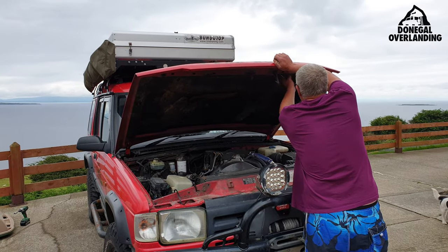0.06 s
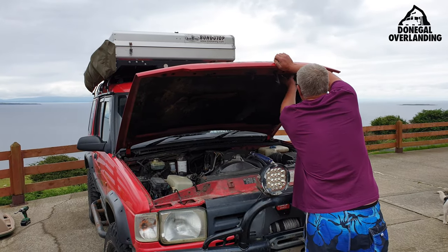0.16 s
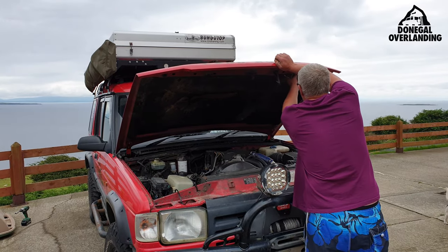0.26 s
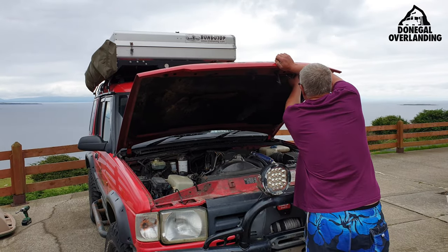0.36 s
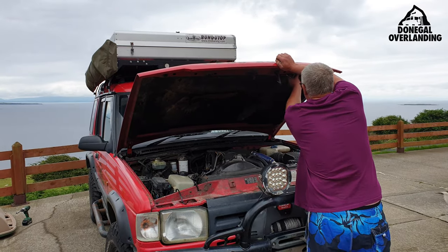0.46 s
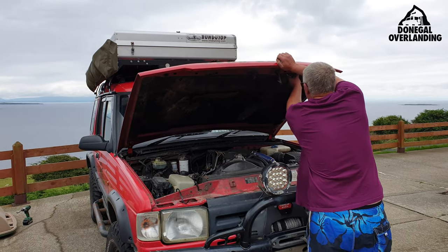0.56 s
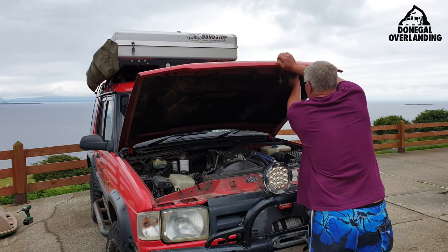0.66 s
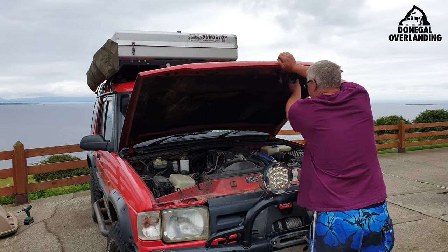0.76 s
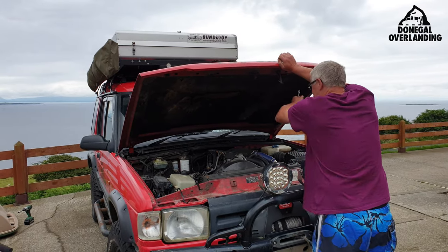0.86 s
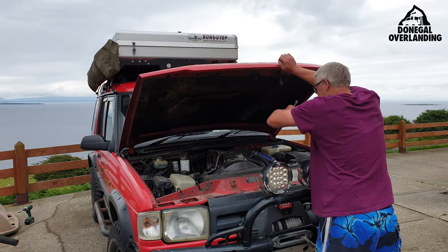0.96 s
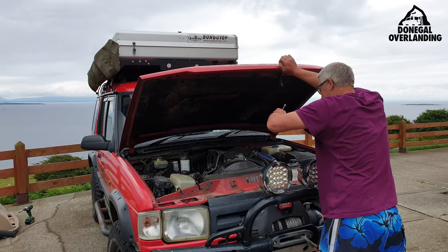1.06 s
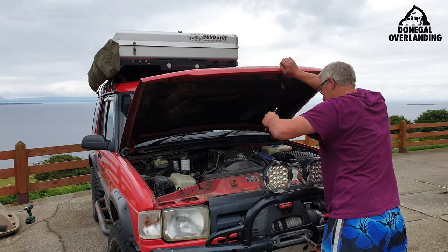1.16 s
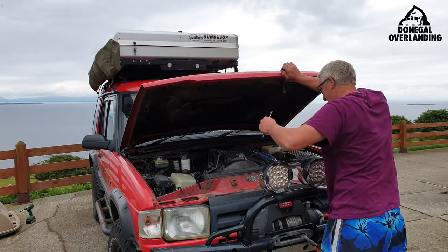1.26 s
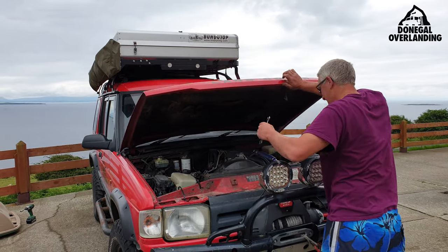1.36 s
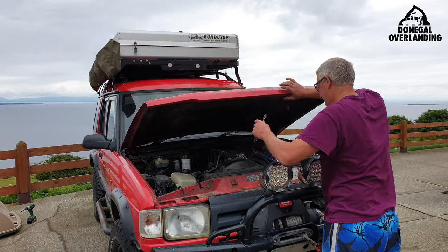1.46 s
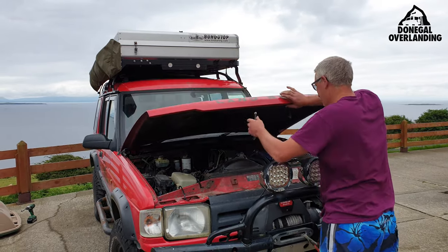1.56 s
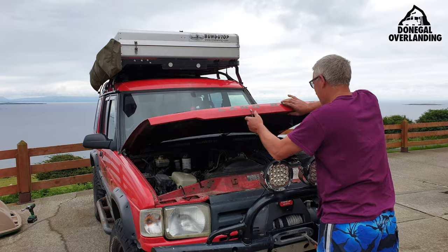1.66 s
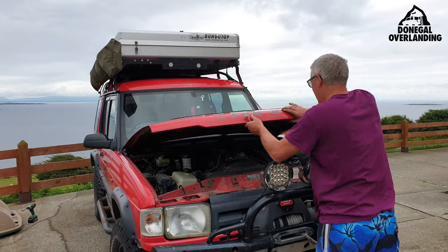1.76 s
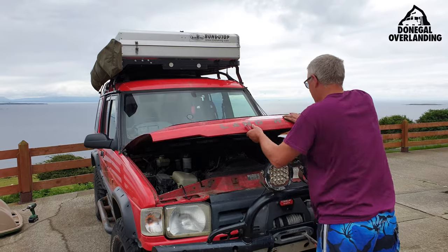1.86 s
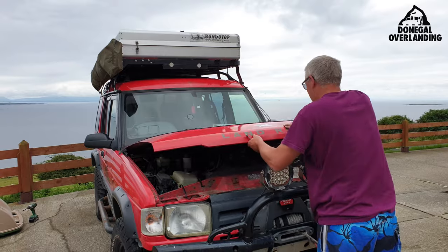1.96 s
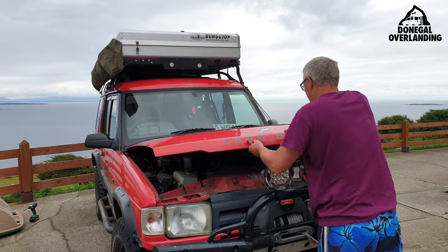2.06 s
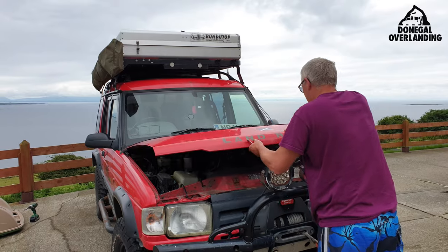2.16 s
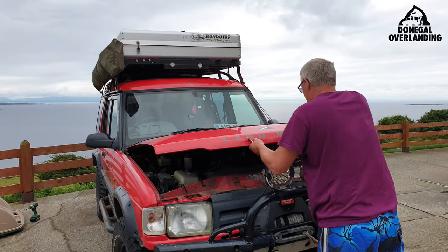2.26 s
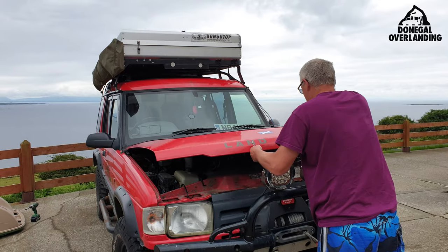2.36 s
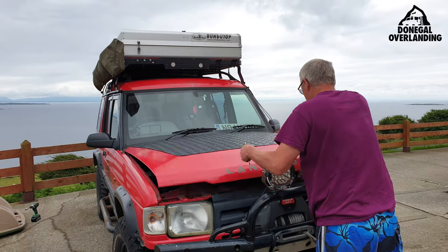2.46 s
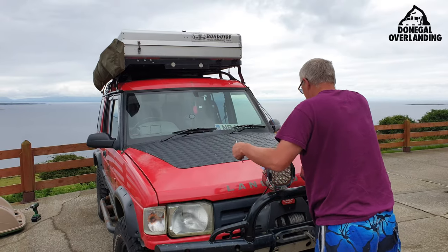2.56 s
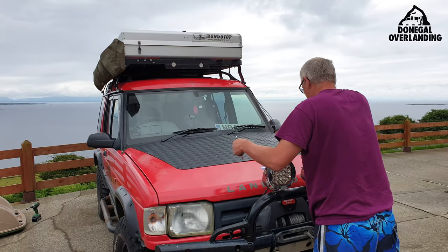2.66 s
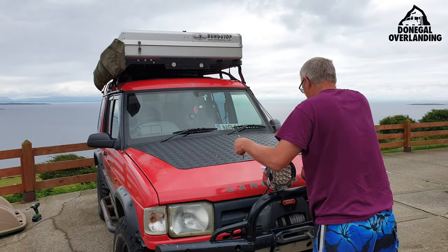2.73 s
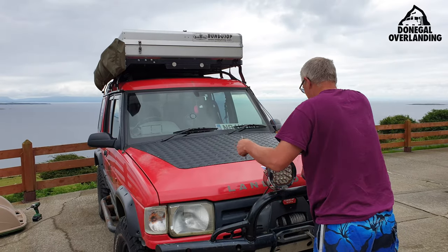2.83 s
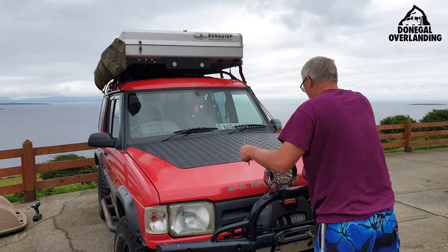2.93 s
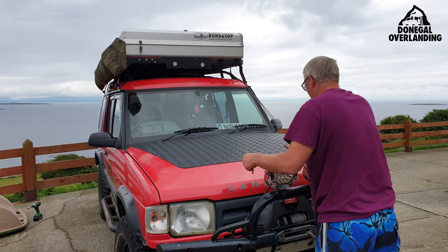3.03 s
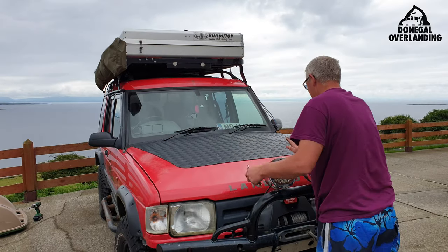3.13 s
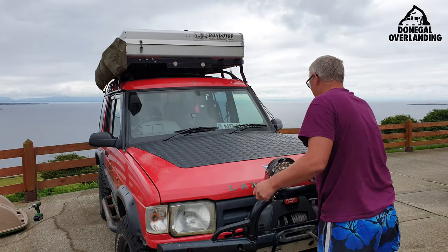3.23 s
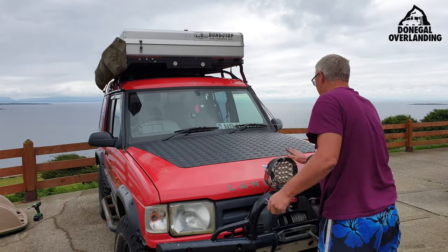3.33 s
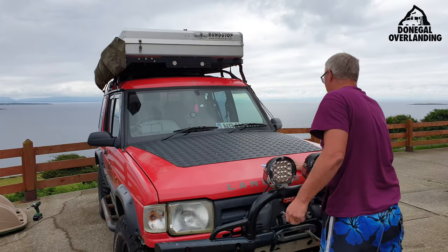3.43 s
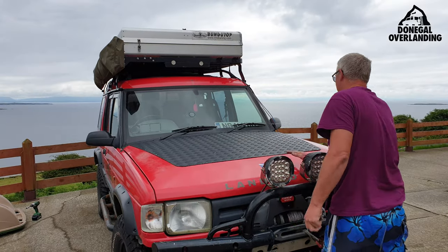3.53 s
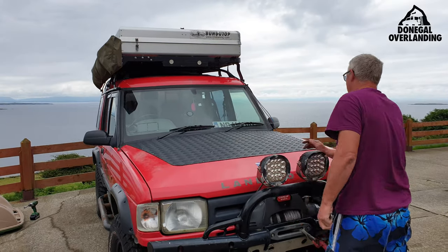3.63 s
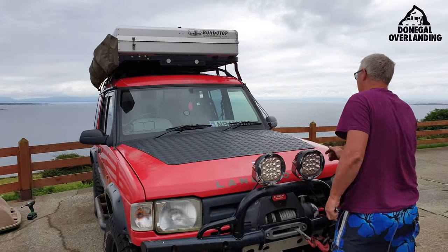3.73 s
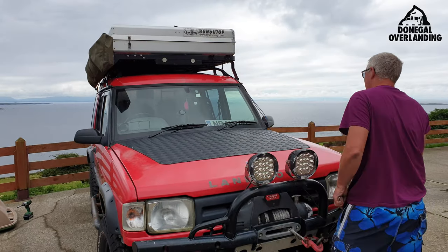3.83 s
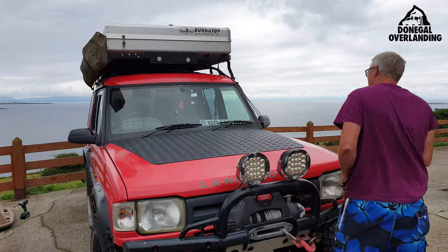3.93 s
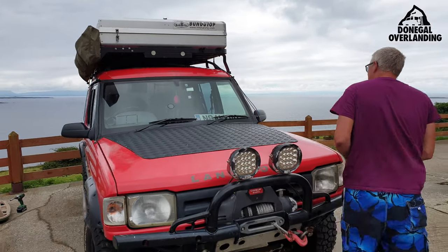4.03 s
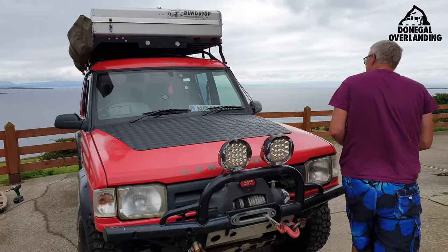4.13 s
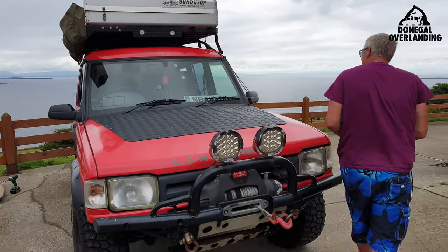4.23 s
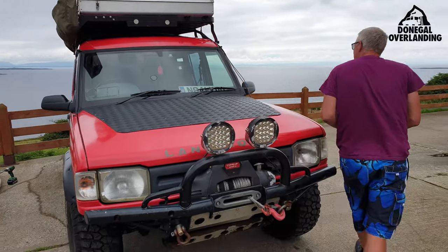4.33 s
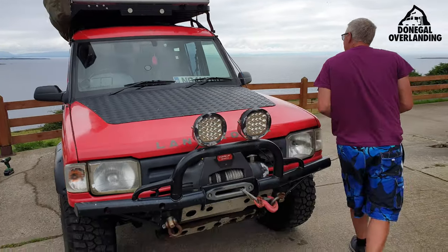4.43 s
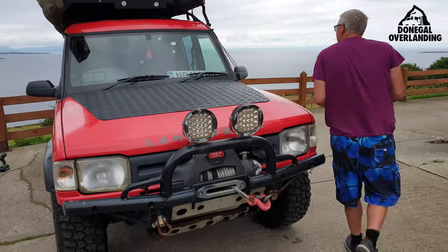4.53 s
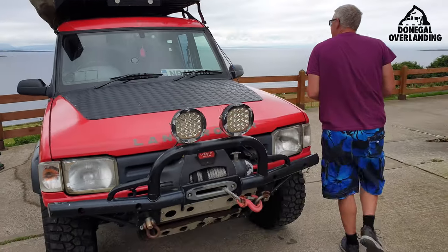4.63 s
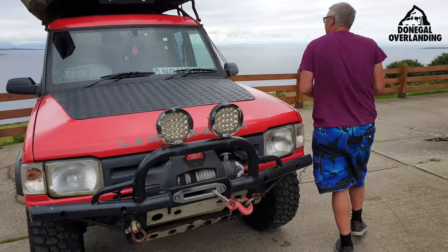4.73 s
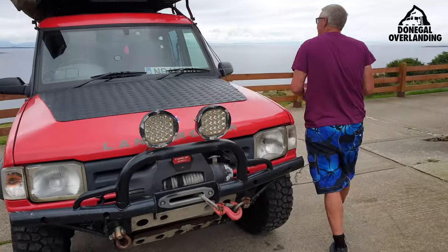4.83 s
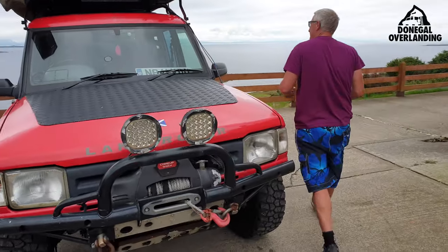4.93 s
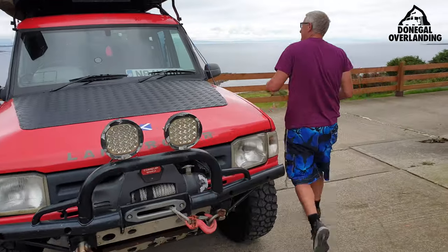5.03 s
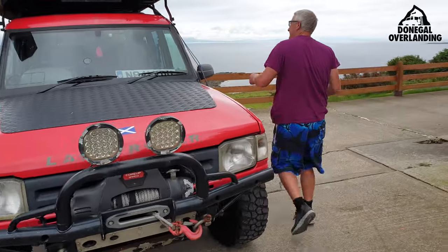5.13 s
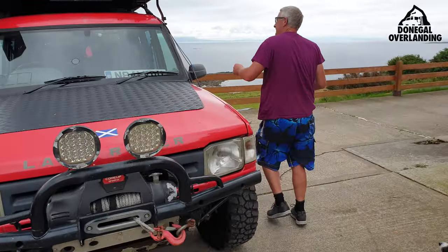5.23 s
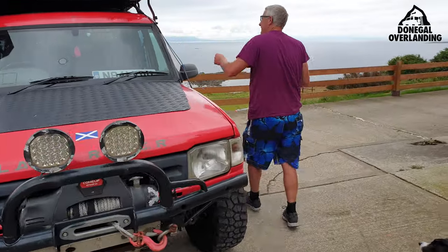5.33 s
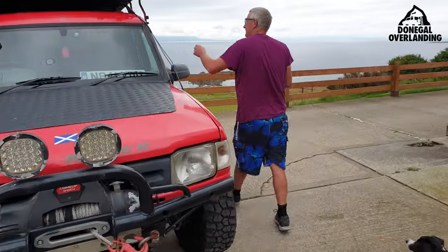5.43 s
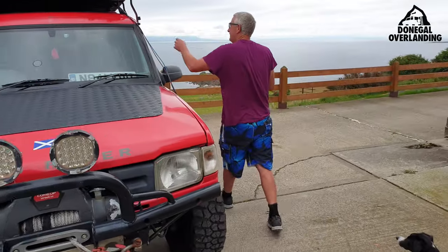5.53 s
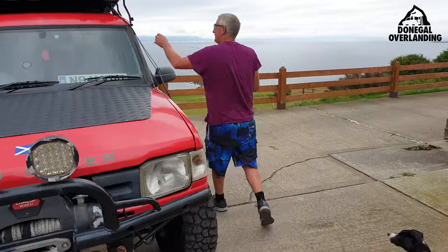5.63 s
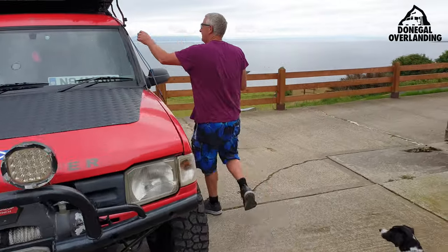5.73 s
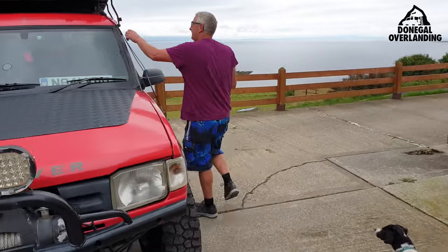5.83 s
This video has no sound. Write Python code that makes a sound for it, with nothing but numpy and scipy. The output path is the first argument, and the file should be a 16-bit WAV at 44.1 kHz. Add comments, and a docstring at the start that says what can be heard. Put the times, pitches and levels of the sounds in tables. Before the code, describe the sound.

On a breezy seafront, a stay rod rattles into place, a bonnet bangs shut, two softer thuds press it down, and quiet steps move off.

```python
"""Car bonnet closed in a windy seaside car park

A man frees and stows a bonnet's stay rod, drops the bonnet onto its latch, presses it twice and walks off.
Blows excite decaying modes and rattling noise; squeaks and bird chirps are narrow noise on gliding pitches.
Gusts rumble on a phone with two unlike ports, over far surf and the rustle of hands, cloth and grit:
these are shaped noise with wandering levels."""
import sys
import numpy as np
from scipy import signal
from scipy.fft import rfft, irfft, next_fast_len
from scipy.io import wavfile
from scipy.ndimage import uniform_filter1d

SR = 44100
rng = np.random.default_rng(int(sys.argv[2]) if len(sys.argv) > 2 else 0)


def waveform_to_disk(signal):
    """Save audio, clipped to [-1, 1], as 16-bit WAV at the path in sys.argv[1]."""
    frames = np.transpose(np.atleast_2d(signal))
    scaled = np.clip(frames, -1, 1) * 32767
    samples = np.round(scaled).astype(np.int16)
    wavfile.write(sys.argv[1], SR, samples)


N = 259731

# Levels in these tables hold ahead of the ports' colour.
# Blows on the bonnet. Each row: start in seconds, nominal peak of the 900-2500 Hz band in dB, weight (low-band
# gain before its shares) in dB, edge (treble gain before its shares) in dB, rattle t60 of the lowest band in
# seconds, boom added to the lowest band in dB, nominal gain of the ringing panel over the rattle in dB.
BONNET_BLOWS = [(2.5347, -20.5, -10.5, 4, 0.27, -9, -14), (2.5554, -24.5, -6, 3, 0.18, -9, 1),
                (2.5712, -22, 5, -3, 0.24, 0, -12.5), (2.5934, -35.5, 8, -24, 0.55, 0.5, -8),
                (2.6225, -38.5, 8, -10, 0.23, 1, -10), (2.6606, -43, 6, 1.5, 0.38, 2, -14.5),
                (3.2506, -43.5, 16, 4.5, 0.18, -4, -5.5), (3.259, -39.5, 11.5, -1.5, 0.11, 0.5, -3),
                (3.2924, -48.5, 7.5, -5, 0.21, 7.5, -7), (3.4472, -41, 2.5, 0.5, 0.12, 3.5, -16),
                (3.4534, -37.5, 11, -4.5, 0.25, -1, -12)]
# Knocks of the stay rod and hinges. Each row: start in seconds, peak in dB, weight in dB, edge in dB,
# t60 in seconds, all as for the bonnet.
ROD_KNOCKS = [(0.02, -50, -1, -15, 0.28), (0.0571, -33.5, 1.5, -3, 0.2), (0.2193, -41.5, -6, -11.5, 0.18),
              (0.3926, -68, 12, 8, 0.37), (0.453, -51, 0, 8, 0.11), (0.473, -42, 7.5, -7, 0.2),
              (0.4974, -40.5, -32, 6.5, 0.14), (0.5218, -25, 6.5, -5.5, 0.2),
              (0.5886, -45.5, 8, 12.5, 0.23), (0.7248, -49.5, -19, -10, 0.39), (0.7685, -44, -19, -6, 0.16),
              (0.8001, -40, -20, -17, 0.13), (0.8165, -51, -14, -8, 0.57), (1.166, -68.5, -16, 7, 0.45),
              (1.3268, -57, -5, 3.5, 0.12), (1.3488, -60, -6, 4.5, 0.77), (1.6295, -54.5, -9.5, 5.5, 0.34),
              (1.6626, -51.5, 1, 2.5, 0.89), (1.7453, -53.5, 1, 2, 0.34), (1.7901, -40, -0.5, -7, 0.25),
              (1.825, -57, 9, 5, 0.16), (1.953, -64, -3, 13.5, 0.17), (1.9975, -43.5, -21, -4, 0.21)]
# Shoes on gritty concrete. Each row: start in seconds, peak in dB, weight in dB, edge in dB, t60 in seconds.
STEPS = [(3.714, -64, 2.5, -2.5, 0.11), (3.7331, -59.5, 8.5, 1, 0.13), (3.763, -58.5, -14, 9.5, 0.22),
         (3.822, -61.5, -6, -4, 0.26), (4.1749, -70, -1, 18, 0.096), (4.3322, -60, 0, -3.5, 0.15),
         (4.4132, -62.5, -4, -5.5, 0.12), (4.4398, -58, -6, 4.5, 0.065), (4.4613, -62.5, -4, 5, 0.06),
         (4.4756, -57.5, -1.5, -1.5, 0.076), (4.6083, -73.5, 9, 8, 0.079), (4.7361, -74, 17, 2.5, 0.11),
         (5.017, -58, 2, -5.5, 0.17), (5.4696, -65, 8.5, -6, 0.1), (5.6059, -69, 21, 12.5, 0.2),
         (5.6393, -56, 1, -5, 0.057), (5.738, -68, 10, 12.5, 0.19)]
# Limits of the six bands of a blow, in Hz.
BAND_EDGES_HZ = [40, 200, 450, 900, 2500, 7800, 16000]
# Level of each band against the 900-2500 Hz band, before weight and edge, in dB.
BONNET_BANDS_DB = [-0.5, -3, -1.5, -1, -7, -12.5]
ROD_BANDS_DB = [-16.5, -6.5, -3.5, 0, -5.5, -11]
SOLE_BANDS_DB = [-7.5, -10.5, -14.5, -0.5, -12.5, -30]
# Share of the weight and of the edge that each band takes, as a plain factor.
WEIGHT_SHARE = [0.98, 0.92, 0.25, 0.025, 0, 0.089]
EDGE_SHARE = [0.018, 0.17, 0.065, 0, 0.9, 0.78]
# Modes of panel, rod and soles. Each row: frequency in Hz, level before scatter in dB,
# t60 before the damping of each blow in seconds.
BONNET_MODES = [(66.4, 0, 0.82), (131.9, -9, 0.51), (165, -18, 0.98), (217, -8, 0.085), (270.4, 2.5, 0.35),
                (293.3, 1.5, 0.89), (342, -6.5, 0.76), (384, -7, 0.18), (504, -24.5, 0.099),
                (582, -5.5, 0.083), (598, -16, 0.4), (651, -5, 0.22), (731, 3, 0.18), (854, -4.5, 0.18),
                (884.5, -12.5, 0.1), (1068, -32, .28), (1080, -9, 0.081), (1390, -12, 0.19),
                (1650, -9.5, 0.18), (1907, -12, 0.086)]
ROD_MODES = [(143, -5, .28), (268.2, 0, 0.6), (300.2, -3, 1), (396.3, -2, 0.24), (548, -4.5, 0.49),
             (725, -5.5, 0.18), (843, -9, 0.078), (1003, -12.5, 0.27), (1280, -5.5, 0.21),
             (1442, -6.5, 0.1), (2102, -13.5, 0.11), (2890, -3.5, 0.081)]
SOLE_MODES = [(150, -17.5, 0.06), (326, -7.5, 0.041)]
# Squeaks and scuffs. Each row: start in seconds, length in seconds, starting pitch in Hz, nominal width in Hz,
# level before the ragged swings in dB.
SQUEAKS = [(0.462, 0.036, 1700, 60, -43), (0.515, 0.02, 1678, 30, -30), (0.722, 0.14, 4460, 450, -66),
           (.85, 0.084, 3960, 450, -72), (1.163, 0.015, 3280, 350, -68.5), (4.257, 0.15, 1892, 2500, -81),
           (4.409, 0.095, 2015, 3000, -75.5), (4.7, .11, 1000, 900, -75.5),
           (5.775, 0.049, 5250, 150, -75.5), (5.835, 0.055, 5340, 250, -65)]
# Rising chirps of far birds. Each row: start in seconds, length in seconds, starting pitch in Hz,
# nominal width in Hz, level before the ragged swings in dB.
CHIRPS = [(5.013, .1, 4320, 900, -83.5), (5.097, 0.061, 3590, 350, -83), (5.135, 0.12, 5000, 900, -78.5),
          (5.428, .11, 4960, 1100, -77.5), (5.55, .06, 4510, 700, -82), (5.74, 0.15, 4440, 1280, -79)]
# Hands, cloth and grit rubbing. Each row: start in seconds, hold in seconds, level before flicker in dB.
RUBS = [(0.0, 0.16, -72.5), (0.25, 0.045, -63), (0.421, .1, -64.5), (0.494, 0.054, -55.5),
        (0.734, 0.15, -64.5), (1.33, 0.13, -73.5), (1.649, 0.26, -70.5), (2.345, .15, -77),
        (3.02, 0.36, -81), (3.718, 0.067, -74.5), (4.295, 0.24, -82.5), (5.002, 0.44, -82),
        (5.576, 0.08, -78.5)]
# Spectral shapes of the noises. Each row: frequency in Hz, relative gain in dB.
RUSTLE_SPECTRUM = [(400, -26.5), (1000, -12), (1800, -7.5), (2300, 7.5), (2700, -1), (3150, -3), (4000, -4),
                   (5500, -4.5), (9000, -8.5), (15000, -15.5)]
WIND_SPECTRUM = [(20, -28.5), (40, 2.5), (60, 11), (100, -7), (160, -3), (300, -45.5)]
SURF_SPECTRUM = [(59, -37), (100, -3.5), (195, -6), (282, -11), (320, 0.5), (358, -13), (393, -14.5),
                 (461, -21), (568, -15), (845, -16.5), (1040, -22.5), (1260, -5), (1500, -19),
                 (2060, -24.5), (4500, -51), (5850, -79.5), (9900, -120)]
# Lean of the surf. Each row: frequency in Hz, left minus right in dB.
SURF_LEAN = [(120, 0.5), (380, -8.5), (700, 0.5)]
# Wind level on the ports. Each row: time in seconds, level before flicker in dB.
GUSTS = [(0.0, -81), (0.15, -61), (0.24, -61.5), (0.36, -54), (0.45, -68), (0.85, -62), (1.2, -67.5),
         (1.6, -67.5), (2.1, -60), (2.27, -66.5), (2.42, -62.5), (2.85, -60.5), (3.2, -67.5), (3.6, -67),
         (4.2, -80.5), (5.05, -77.5), (5.33, -64), (5.55, -67.5), (5.89, -56)]
# Far surf level. Each row: time in seconds, level in dB.
SWELL = [(0.0, -58), (.3, -62.5), (0.9, -65.5), (1.5, -66), (1.85, -63.5), (2.4, -64.5), (3.5, -64.5),
         (3.75, -70), (4.5, -73.5), (5.89, -75)]
# Colour of the ports. Each row: frequency in Hz, left gain in dB, right gain in dB.
PORTS = [(60, 4, 4), (352, 10, 8), (700, 8, 4.5), (1320, 0.5, -3), (2440, -3.5, -5), (3100, 2.5, 4),
         (5240, 0, -10), (6480, 4, -11.5), (6894, 8, -23), (6750, -0.5, -13), (8620, -18.5, -35),
         (8580, -9.5, -24.5), (10100, 3, -12), (14200, -4.5, -9), (15500, -7, -17.5)]

# Ring of the rod over its rattle for a knock at -60 dB; harder knocks ring more.
ROD_RING_DB, ROD_RING_DB_PER_DB = -24.5, 0.625
SOLE_RING_DB = -37
SQUEAK_GLIDE, CHIRP_GLIDE = -0.06, 0.11  # share by which the pitch moves
THUMP_S, THUMP_HZ, THUMP_DB, THUMP_PAN_DB = 5.8795, 75, -36, 12  # pan: left minus right
RUB_ATTACK_DB_PER_S, RUB_RELEASE_DB_PER_S, RUB_FLOOR_DB = 602, 88, -85.5
LIMIT = 0.34  # ceiling of the soft clipping, full scale = 1
TOP_HZ = 15750


def undb(db):
    """Decibel law: amplitude ratio of a level."""
    return 10 ** (np.asarray(db) / 20)


def rms1(x):
    """Normalisation to unit root-mean-square."""
    return x / np.sqrt(np.mean(x ** 2))


def pair(pan_db):
    """Level difference between channels: left and right gains for left minus right in dB."""
    return undb(np.array([[pan_db], [-pan_db]]) / 2)


def add(out, x, s):
    """Superposition: mix x into out from second s."""
    i = int(s * SR)
    out[:, i:i + x.shape[1]] += x[:, :N - i]


def butter(order, hz, kind):
    """Maximally flat filter, as second-order sections."""
    return signal.butter(order, hz, kind, fs=SR, output="sos")


def colour(x, hz, db):
    """Spectral shaping along straight lines on a log-frequency axis."""
    size = next_fast_len(x.shape[-1])
    f = np.maximum(np.arange(size // 2 + 1) * SR / size, 1)
    gain = undb(np.interp(np.log(f), np.log(hz), db))
    return irfft(rfft(x, size) * gain, size)[..., :x.shape[-1]]


def wide_noise(size, alike_hz):
    """Partial coherence: two channels alike well below alike_hz and unrelated well above."""
    mid, side = rng.standard_normal((2, size))
    side = signal.sosfilt(butter(1, alike_hz, "high"), side)
    return np.array([mid + side, mid - side])


def smooth_noise(size, span):
    """Low-pass by moving average: noise averaged over span samples."""
    return uniform_filter1d(rng.standard_normal(size), span)


def walk(rate):
    """Random modulation: levels held 1 / rate s, then averaged twice over that time."""
    k = int(SR / rate)
    held = np.repeat(rng.standard_normal(N // k + 1), k)
    return 0.93 * uniform_filter1d(uniform_filter1d(held, k), k)[:N]


def hits(events, bands_db, modes, crack_db, hold_ms, hold_ms_per_db, ring_stretch, push_ms, crack_ms,
         alike_hz, fade_ratio, pan_db):
    """Modal excitation by impact: a crack, ringing modes and a rattle that holds, then decays band by band."""
    out, t = np.zeros((2, N)), np.arange(SR // 2) / SR
    bands = [butter(3, edges, "band") for edges in zip(BAND_EDGES_HZ[:-1], BAND_EDGES_HZ[1:])]
    hz, mode_db, mode_t60 = (c[:, None] for c in np.transpose(modes))
    decay = np.log(1000)  # 60 dB
    rings = np.sin(2 * np.pi * hz * t) * np.exp(-decay * t / mode_t60)
    rings *= 1 - np.exp(-t * 1000 / push_ms)
    crack = undb(crack_db) * np.exp(-t * 1000 / crack_ms)
    for s, db, weight_db, edge_db, t60, boom_db, ring_db in events:
        # every blow lands on another spot, so the modes share it differently; a resting hand damps them
        scatter_db = 2 * rng.standard_normal(len(modes))
        shares = undb(mode_db[:, 0] + scatter_db) * (-1) ** np.arange(len(modes))
        damping = np.exp(-decay * t / (ring_stretch * t60))
        ring = undb(ring_db) * (shares @ rings) * damping

        rattle = wide_noise(len(t), alike_hz) * (1 - np.exp(-t / 0.00072))
        rattle *= undb(1.3 * rms1(smooth_noise(len(t), SR // 250)))  # loose parts clatter unevenly
        hold = max(hold_ms + hold_ms_per_db * (db + 59), 0) / 1000  # hold_ms is for a blow at -59 dB
        late = np.maximum(t - hold, 0)

        colour_db = np.array(bands_db) + weight_db * np.array(WEIGHT_SHARE) + edge_db * np.array(EDGE_SHARE)
        colour_db[0] += boom_db
        blow = 0
        for k, (sos, rel_db) in enumerate(zip(bands, colour_db)):
            # a ratio above 1 lets the treble die first, below 1 the lows
            fade = np.exp(-decay * late * fade_ratio ** k / t60)
            band = signal.sosfilt(sos, rattle * (fade + crack) + ring)
            loudest = np.sqrt(uniform_filter1d(band.mean(axis=0) ** 2, SR // 100).max())
            blow = blow + band * undb(db + rel_db - 7.5) / loudest  # rms set 7.5 dB under the nominal peak
        add(out, blow * pair(pan_db), s)
    return out


def bonnet():
    """Plate vibration: blows on latch and panel sound low modes and a long rattle."""
    return hits(BONNET_BLOWS, BONNET_BANDS_DB, BONNET_MODES, crack_db=2.0, hold_ms=9.0,
                hold_ms_per_db=0.2349, ring_stretch=1.8, push_ms=5.0, crack_ms=1.5, alike_hz=2200,
                fade_ratio=1.088, pan_db=1.4)


def stay_rod():
    """Bar vibration: the harder the knock, the more its modes stand out of the rattle."""
    knocks = [(*row, 0, ROD_RING_DB + ROD_RING_DB_PER_DB * (row[1] + 60)) for row in ROD_KNOCKS]
    return hits(knocks, ROD_BANDS_DB, ROD_MODES, crack_db=9.0, hold_ms=2.1, hold_ms_per_db=0.51,
                ring_stretch=2.14, push_ms=0.97, crack_ms=1.6, alike_hz=1550, fade_ratio=1.148, pan_db=0.9)


def footsteps():
    """Damped impact: soles on grit give mostly cracking noise and hardly ring."""
    steps = [(*row, 0, SOLE_RING_DB) for row in STEPS]
    return hits(steps, SOLE_BANDS_DB, SOLE_MODES, crack_db=15, hold_ms=2.5, hold_ms_per_db=-1,
                ring_stretch=2.5, push_ms=1.5, crack_ms=0.97, alike_hz=880, fade_ratio=0.94, pan_db=0.5)


def gliding_tones(events, glide):
    """Narrow-band noise around a gliding carrier: clean when narrow, a hiss when wide."""
    out = np.zeros((2, N))
    for s, length, hz, width_hz, db in events:
        size, span = int(length * SR), int(SR / width_hz)
        slow = uniform_filter1d(smooth_noise((2, SR // 4), span), span)
        in_phase, quadrature = slow[:, :size]
        phase = 2 * np.pi * np.cumsum(hz * np.linspace(1, 1 + glide, size)) / SR
        tone = rms1(in_phase * np.cos(phase) + quadrature * np.sin(phase))
        tone *= np.sqrt(np.hanning(size))
        tone *= undb(2.7 * rms1(smooth_noise(size, SR // 100)))  # ragged level
        add(out, undb(db) * tone * np.ones((2, 1)), s)
    return out


def rubbing_db(t):
    """Masking by the strongest: every rub rises fast, holds and fades; the loudest one sets the level."""
    s, hold, db = (c[:, None] for c in np.transpose(RUBS))
    rise = RUB_ATTACK_DB_PER_S * np.maximum(s - t, 0)
    fall = RUB_RELEASE_DB_PER_S * np.maximum(t - s - hold, 0)
    return np.maximum((db - rise - fall).max(axis=0), RUB_FLOOR_DB)


def rustle(db):
    """Granular friction: millisecond grains, a few much larger than the rest; harder rubbing is brighter."""
    sizes = undb(2.6 * rng.exponential(size=N // 40 + 1))
    grains = uniform_filter1d(sizes.repeat(40)[:N], 40)
    noise = rms1(colour(wide_noise(N, 1500) * grains, *np.transpose(RUSTLE_SPECTRUM)))
    top = signal.sosfilt(butter(4, 8000, "high"), noise)
    body = signal.sosfilt(butter(4, 8000, "low"), noise)
    bright_db = 0.5 * (db + 62)
    return (body + top * undb(bright_db)) * undb(db + 4.8 * walk(29))


def thump():
    """Pressure pulse: one brief low swing of a hard wind thump on the phone, stronger at left."""
    out, t = np.zeros((2, N)), np.arange(-SR // 20, SR // 20) / SR
    swing = np.cos(2 * np.pi * THUMP_HZ * t) * np.exp(-(1.5 * THUMP_HZ * t) ** 2)
    add(out, undb(THUMP_DB) * swing * pair(THUMP_PAN_DB), THUMP_S + t[0])
    return out


def wind(db):
    """Turbulent pressure on the ports: low rumble whose level follows the gusts and flickers."""
    noise = rms1(colour(wide_noise(N, 140), *np.transpose(WIND_SPECTRUM)))
    return noise * undb(db + 2.9 * walk(11)) * pair(2.6)


def surf(db):
    """Independent band modulation: octaves flicker alone; the low mids favour the right port."""
    noise = colour(wide_noise(N, 150), *np.transpose(SURF_SPECTRUM))
    lean_hz, lean_db = np.transpose(SURF_LEAN)
    left, right = colour(noise[0], lean_hz, lean_db / 2), colour(noise[1], lean_hz, -lean_db / 2)
    noise = np.array([left, right])
    octaves = [butter(2, [hz, 2 * hz], "band") for hz in 80 * 2 ** np.arange(6)]
    flicker = sum(signal.sosfilt(sos, noise) * undb(1.5 * walk(7)) for sos in octaves)
    return rms1(flicker) * undb(db)


def background():
    """Superposition of steady noises: rustle, gusty wind and far surf."""
    t = np.arange(N) / SR
    gust_db, swell_db = (np.interp(t, *np.transpose(curve)) for curve in (GUSTS, SWELL))
    return rustle(rubbing_db(t)) + wind(gust_db) + surf(swell_db)


def scene():
    """Superposition of all sources, ahead of the ports."""
    handling = bonnet() + stay_rod() + footsteps() + gliding_tones(SQUEAKS, SQUEAK_GLIDE)
    birds = gliding_tones(CHIRPS, CHIRP_GLIDE)
    return handling + birds + thump() + background()


def causal(hz, db, size=1024):
    """Minimum-phase response with the given gains, from the folded cepstrum."""
    f = np.maximum(np.arange(size // 2 + 1) * SR / size, 1)
    cep = irfft(np.interp(np.log(f), np.log(hz), db) * np.log(10) / 20, size)
    cep[1:size // 2] *= 2
    cep[size // 2 + 1:] = 0
    return irfft(np.exp(rfft(cep)), size)


def record(dry):
    """Port filtering and saturation: each port has its own colour, peaks are rounded and the top is cut."""
    hz, *port_db = np.transpose(PORTS)
    ports = np.array([signal.fftconvolve(x, causal(hz, db))[:N] for x, db in zip(dry, port_db)])
    rounded = LIMIT * np.tanh(ports / LIMIT)
    return signal.sosfilt(signal.ellip(10, 0.2, 70, TOP_HZ, fs=SR, output="sos"), rounded)


dry = scene()
out = record(dry)
waveform_to_disk(out)
```